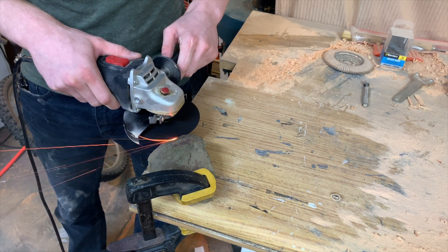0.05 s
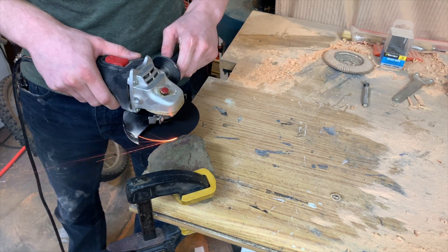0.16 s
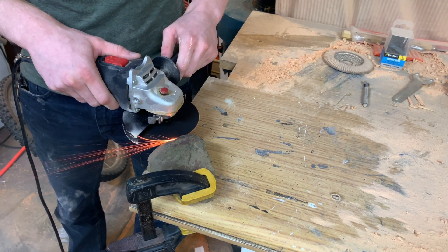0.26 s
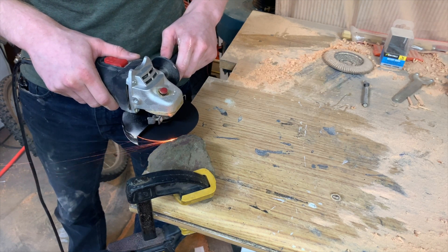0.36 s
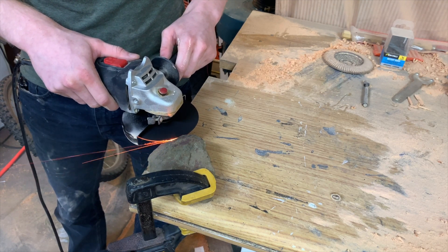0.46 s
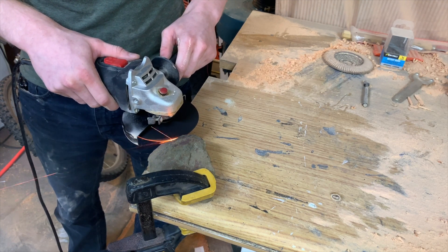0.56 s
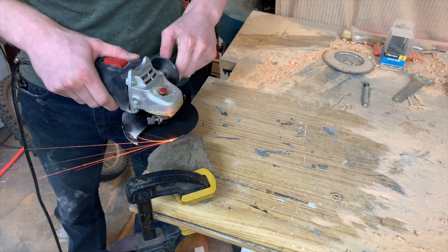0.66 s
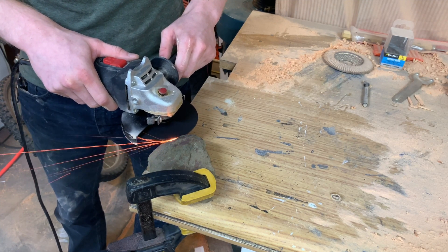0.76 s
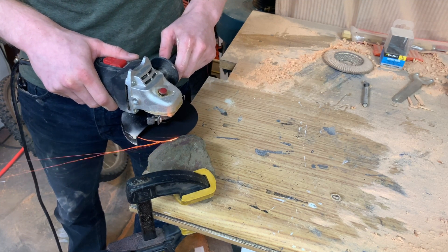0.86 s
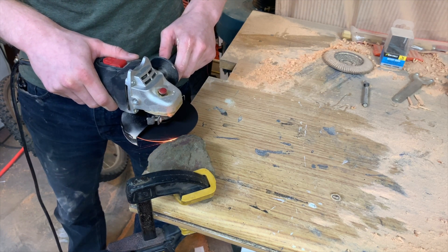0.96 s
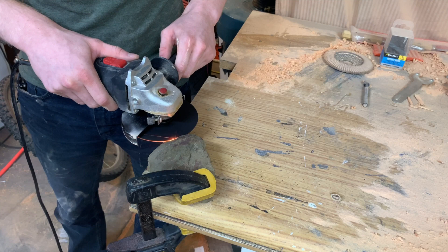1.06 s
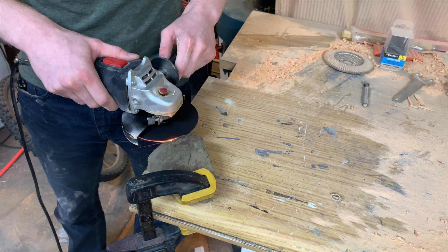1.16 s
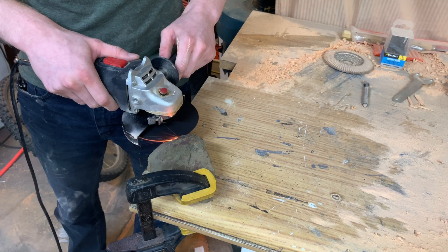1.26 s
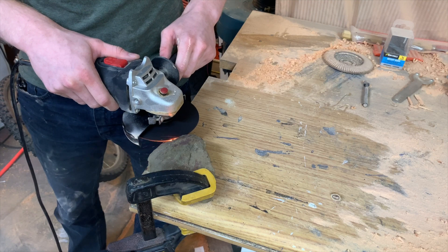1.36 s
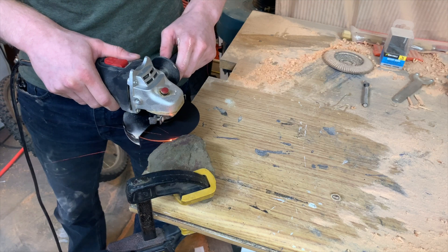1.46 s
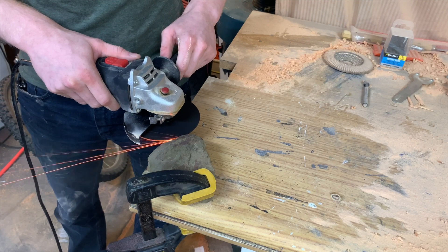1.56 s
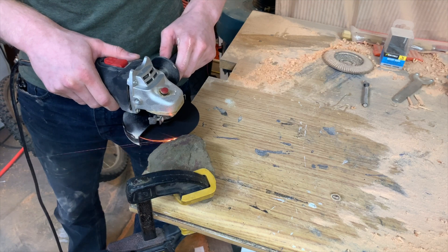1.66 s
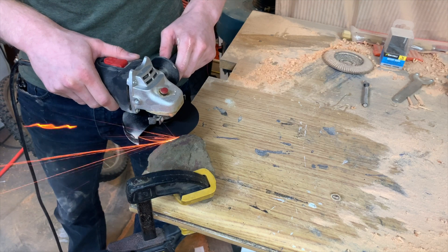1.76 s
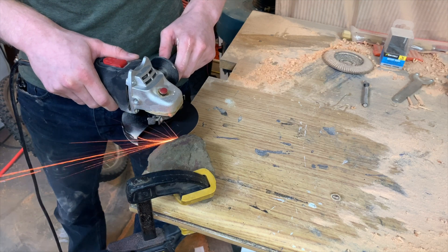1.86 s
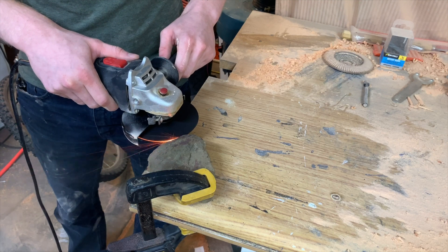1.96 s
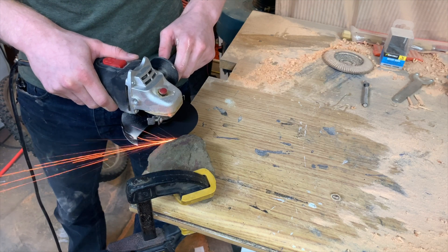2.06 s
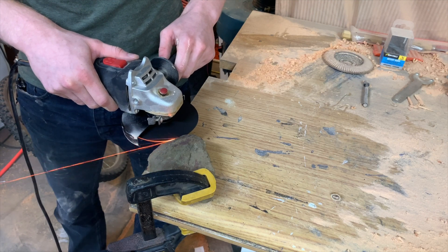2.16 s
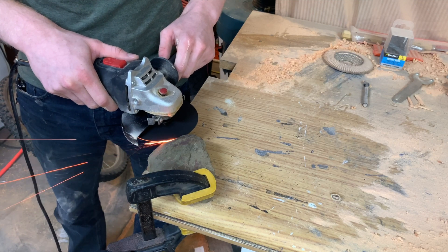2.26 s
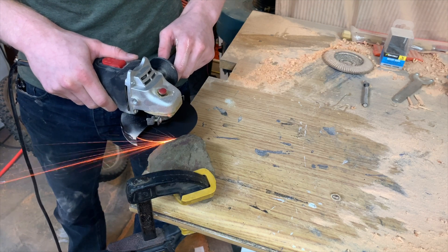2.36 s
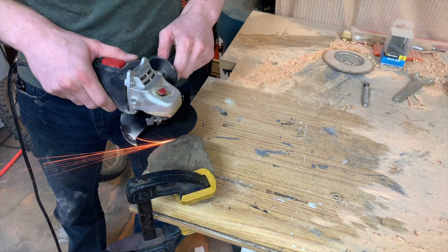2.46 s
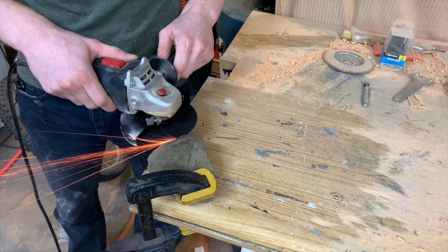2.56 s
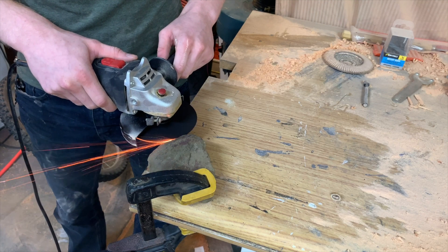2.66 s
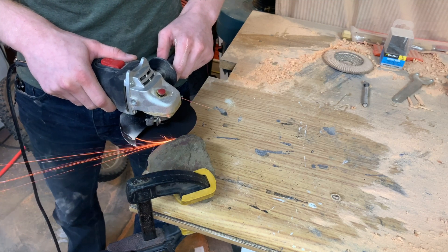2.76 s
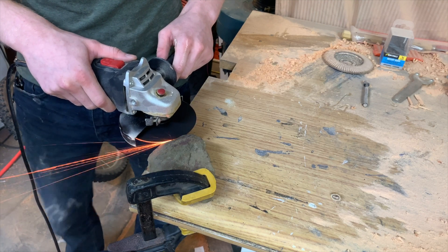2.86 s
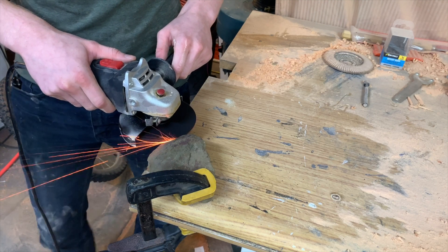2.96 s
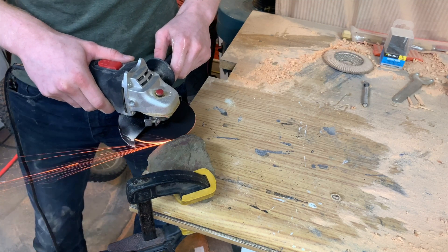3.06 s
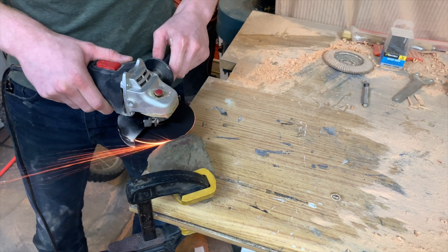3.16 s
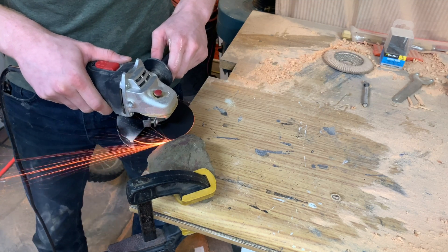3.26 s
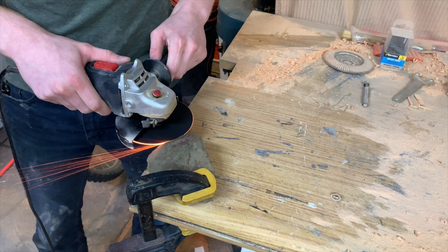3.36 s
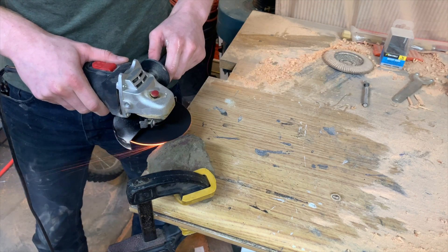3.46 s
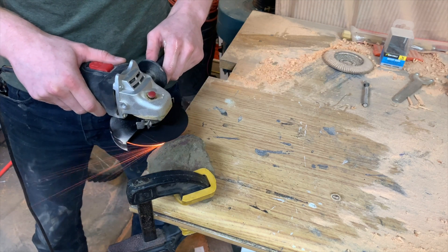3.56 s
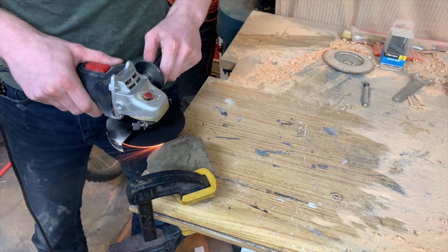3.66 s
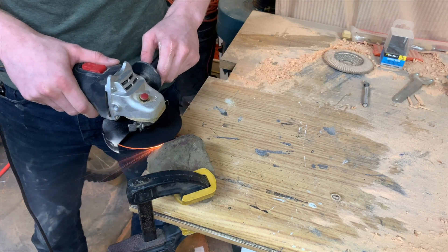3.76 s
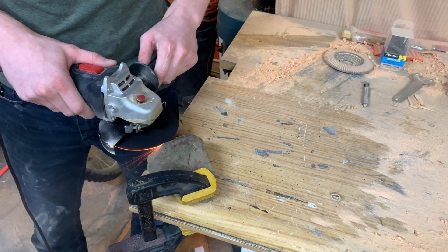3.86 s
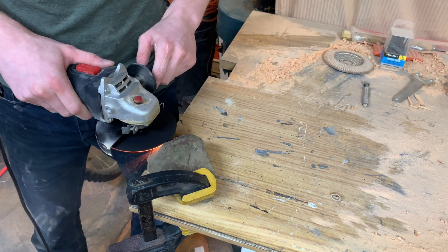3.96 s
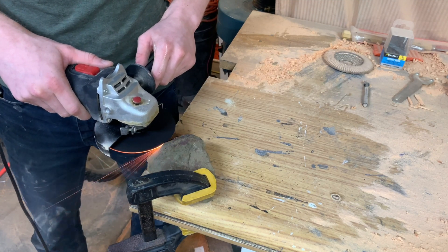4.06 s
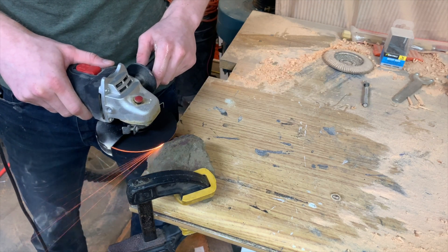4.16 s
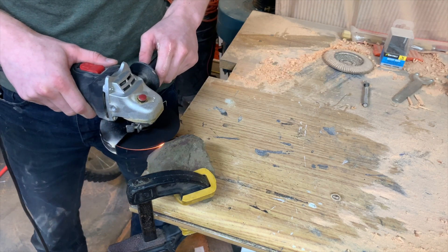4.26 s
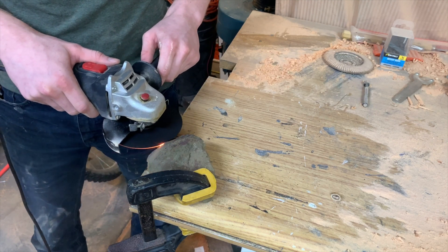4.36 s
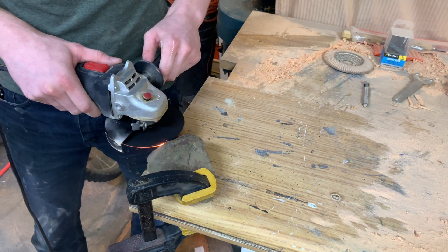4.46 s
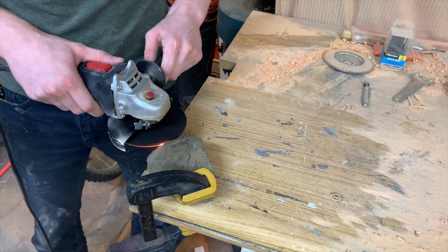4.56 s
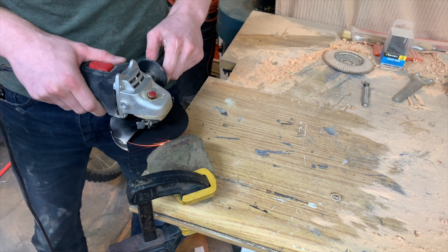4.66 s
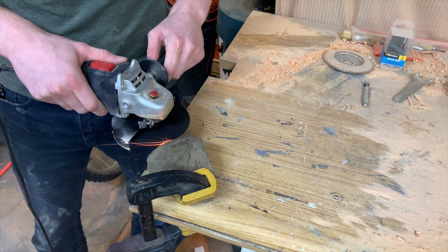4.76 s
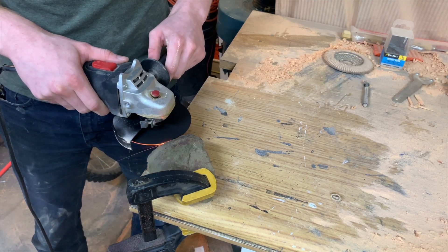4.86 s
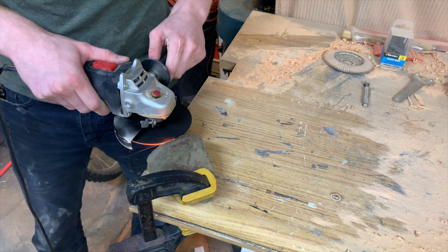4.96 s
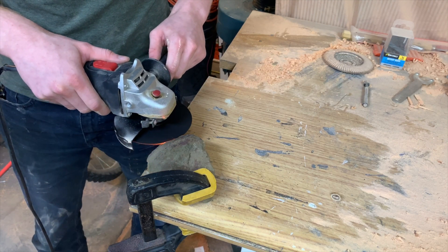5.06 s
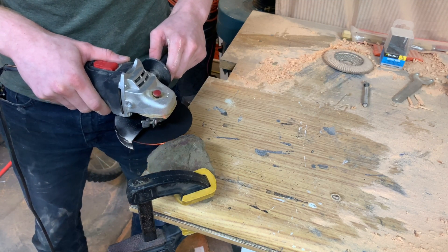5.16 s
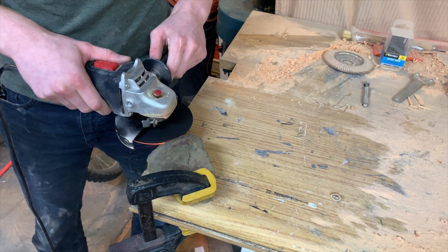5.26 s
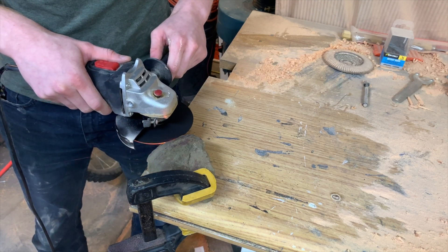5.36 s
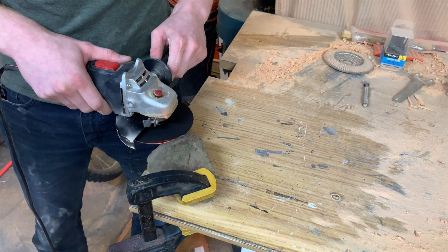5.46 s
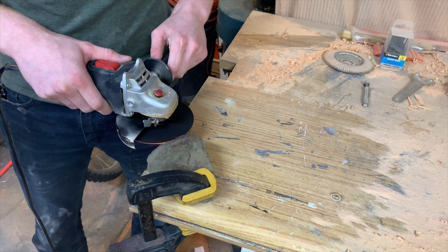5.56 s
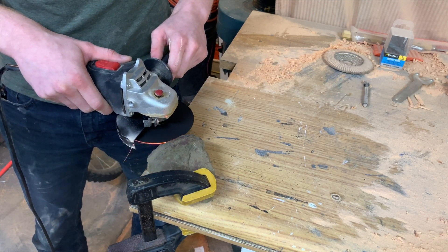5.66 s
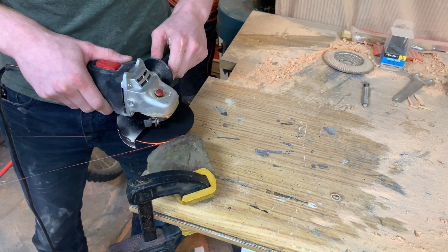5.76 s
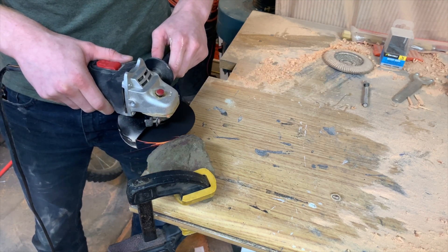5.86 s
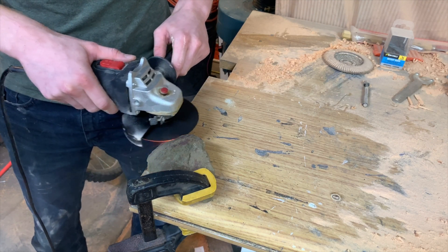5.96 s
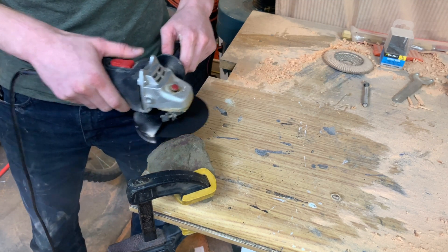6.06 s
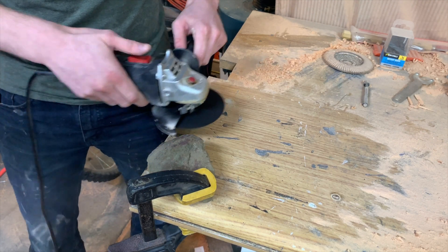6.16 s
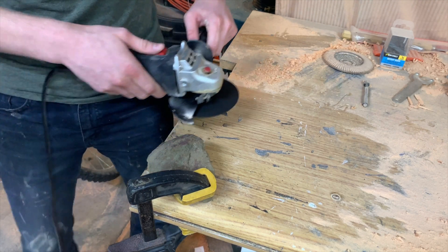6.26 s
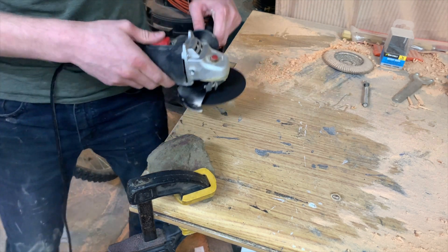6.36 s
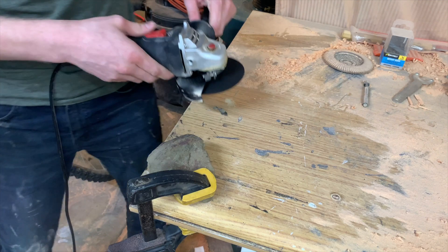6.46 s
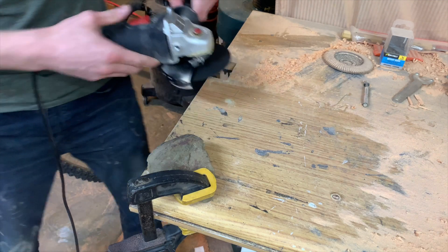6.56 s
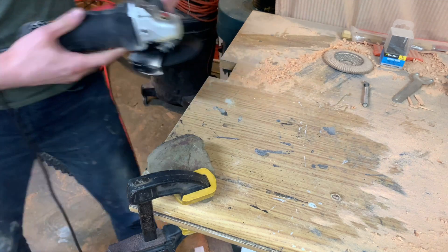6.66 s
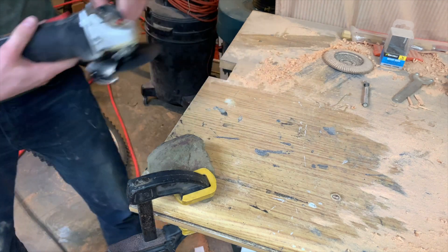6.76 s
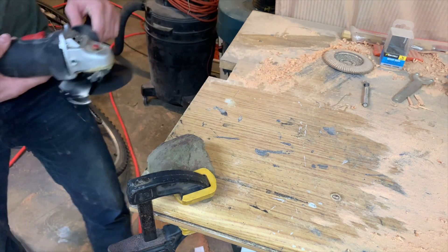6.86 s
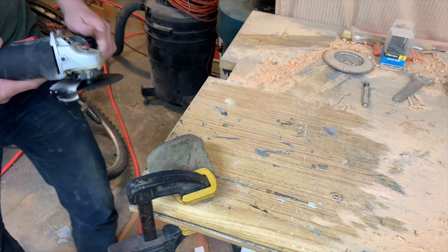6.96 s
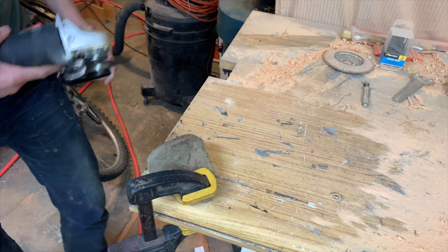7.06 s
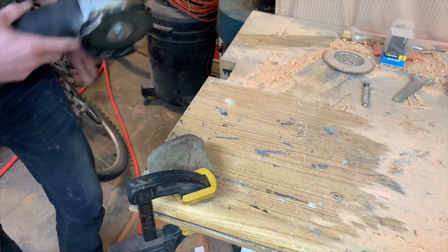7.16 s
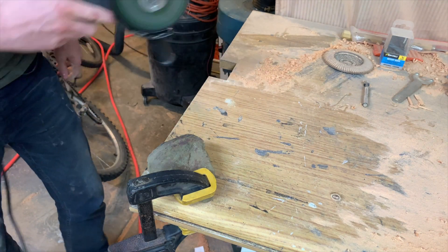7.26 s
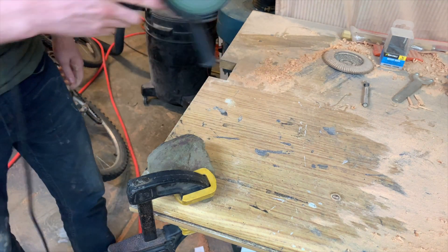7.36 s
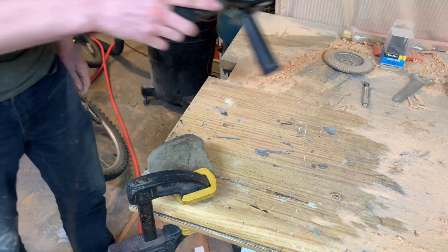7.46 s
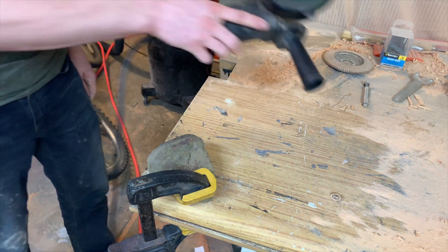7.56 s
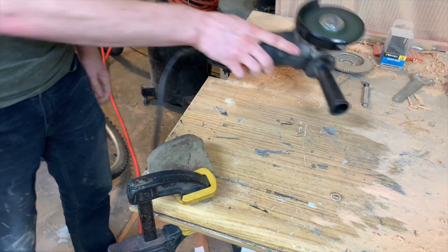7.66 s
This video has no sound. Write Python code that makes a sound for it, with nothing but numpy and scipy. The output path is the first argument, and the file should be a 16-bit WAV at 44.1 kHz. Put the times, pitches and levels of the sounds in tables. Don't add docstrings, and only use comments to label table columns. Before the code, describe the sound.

The sound begins with an angle grinder already cutting into a clamped rock in a workshop: a dense, loud, abrasive screech with bright gritty hiss, ringing wheel resonances around the upper midrange and a buzzing, fluttering drone from the tool body. From 0 to 3.5 seconds it bites steadily, speeding up slightly near 0.8, then sagging and labouring around 2 to 3.4. From about 3.6 to 4.9 the pressure eases; the wheel skims more lightly, quieter and faster, before bearing down again from 5 to 6. At about 6.1 the wheel lifts and the scraping cuts off at once. The freed motor revs up to full speed by 6.4, a breathy fan rush with hum and faint high whine. From about 6.7 power is off and the pitch sinks, with irregular metallic gear clacks and rattles until the end at 7.7, still spinning. Close stereo pickup, short room reverberation.

```python
import sys
import numpy as np
from scipy import signal
from scipy.fft import rfft, irfft, next_fast_len
from scipy.io import wavfile
from scipy.ndimage import uniform_filter1d

SR = 44100
rng = np.random.default_rng(int(sys.argv[2]) if len(sys.argv) > 2 else 0)


def to_wav(s):
    ch = np.atleast_2d(s).T
    pcm = np.round(np.clip(ch, -1, 1) * 32767)
    wavfile.write(sys.argv[1], SR, pcm.astype(np.int16))


def natural_amplitude(level_db):
    exponent = np.asarray(level_db, float) / 20
    return 10 ** exponent


N = 340438
TIME = np.arange(N) / SR
LIFT_S = 6.11


def evened(x):
    return x / np.sqrt(np.mean(x ** 2) + 1e-20)


def ramp(x, start, span):
    return np.clip((x - start) / span, 0, 1)


def columns(rows):
    s, *values = np.transpose(rows)
    return [np.interp(TIME, s, value) for value in values]


def read(points, hz):
    f, value = np.transpose(points)
    return np.interp(np.log(hz + 1), np.log(f + 1), value)


def colour(x, points, lag=((1, 0),)):
    size = next_fast_len(N)
    hz = np.fft.rfftfreq(size, 1 / SR)
    phase = -2 * np.pi * hz * read(lag, hz) / SR
    gain = natural_amplitude(read(points, hz)) * np.exp(1j * phase)
    return irfft(rfft(x, size) * gain, size)[..., :N]


def ring(x, modes):
    total = 0
    for k, (hz, width, db) in enumerate(modes):
        pole = np.exp((2j * hz - width) * np.pi / SR)
        mode = signal.lfilter([1], [1, -2 * pole, pole * pole], x).real
        total = total + (-1) ** k * natural_amplitude(db) * evened(mode)
    return evened(total)


def ring_moving(x, modes, stretch):
    total = np.zeros(N)
    for k, (hz, width, db) in enumerate(modes):
        carrier = np.exp(2j * np.pi * np.cumsum(hz * stretch) / SR)
        decay = np.exp(-np.pi * width / SR)
        smoothed = signal.lfilter([1], [1, -2 * decay, decay * decay], x / carrier)
        total += (-1) ** k * natural_amplitude(db) * evened((carrier * smoothed).real)
    return evened(total)


def drift(hz):
    rate = 400
    steps = rng.standard_normal(int(N / SR * rate) + 800)
    b, a = signal.butter(1, min(hz / (rate / 2), .99))
    slow = evened(signal.filtfilt(b, a, steps)[400:])
    return np.interp(np.arange(N) * rate / SR, np.arange(len(slow)), slow)


def grains(per_s, spread_db):
    size = natural_amplitude(spread_db * np.minimum(rng.exponential(1, N), 5))
    sign = rng.choice([-1., 1.], N)
    return size * sign * (rng.random(N) < per_s / SR)


# (f/Hz, level/dB)
ROOM_SPECTRUM = [(100, -7), (700, -4), (1400, 1), (2100, -2), (3400, -5), (5500, 1), (7500, -4),
                 (15000, -5)]


def room(x, count=3):
    t60, length = .25, 12000
    shape = (count, 2, length)
    taps = rng.choice([-1., 1.], shape) * (rng.random(shape) < .06)
    taps = taps * natural_amplitude(-60 * np.arange(length) / SR / t60)
    taps[..., :120] = 0
    taps = taps / np.linalg.norm(taps[0, 0])
    turn = np.pi * (1.311 * TIME + np.arange(count)[:, None] / count)
    feeds = np.sqrt(2 / count) * np.cos(turn) * colour(x, ROOM_SPECTRUM)
    wet = signal.oaconvolve(feeds[:, None], taps, axes=2).sum(0)[:, :N]
    bass = signal.butter(2, 800, fs=SR, output="sos")
    gap = signal.sosfiltfilt(bass, wet[0] - wet[1])
    return wet + np.array([-gap, gap]) * .3


# (f/Hz, level/dB)
FAN_AIR = [(60, -20), (200, -13.5), (600, -1), (1300, -1), (2200, 2.5), (4000, 3), (5500, -11), (8600, -3),
           (11000, -12), (13600, -6), (15500, -15)]
# (f/Hz, bandwidth/Hz, level/dB)
HOUSING_MODES = [(1370, 140, -13.5), (2060, 280, -9.5), (2420, 400, -11), (4240, 850, 4), (6830, 5500, 1.5)]
# (t/s, level/dB)
BLADE_WHINE = [
    (6.2, -46),
    (6.3, -36),
    (6.45, -31),
    (6.72, -32),
    (6.82, -44),
    (7.72, -54),
]
# (t/s, vents turned away/0-1, nearness/dB, armature hum/dB)
TOOL_SWING = [
    (6.12, 0, -1.5, -35),
    (6.42, 0.24, -0.5, -49),
    (6.55, 0.25, -3, -43.5),
    (6.78, 0, -2.5, -41),
    (7.05, 0, -2.5, -39.5),
    (7.3, 0.3, 1.5, -49),
    (7.43, 1, 1.5, -32.5),
    (7.6, 0.95, 7.5, -37),
    (7.72, 1, 5.5, -53),
]


def motor(speed, turns):
    away, near_db, hum_db = columns(TOOL_SWING)
    whine_db, = columns(BLADE_WHINE)
    loaded = np.clip((LIFT_S - TIME) / .06, 0, 1)

    speed_law, free_speed = 3.2, 163
    air_db = -27.5 + near_db + speed_law * 20 * np.log10(speed / free_speed)
    tilt_db = 9 - 7 * away
    air = evened(colour(rng.standard_normal(N) * natural_amplitude(1.5 * drift(27.0)), FAN_AIR))
    treble = signal.sosfilt(signal.butter(2, 5000, "high", fs=SR, output="sos"), air)
    air = natural_amplitude(air_db + 2.5) * (air + (natural_amplitude(tilt_db) - 1) * treble)

    slack = ramp(TIME, 6.66, 0.081)
    housing_db = -46 + 8 * slack * (1 - 1.6 * away)
    housing = natural_amplitude(housing_db + 4.6 * drift(25.0)) * ring(grains(9000, 3.4), HOUSING_MODES)

    gear, blades = 3, 18
    shaft = 2 * np.pi * gear * turns
    hum = np.sqrt(2) * np.cos(shaft + 0.33 * drift(29.0))
    hum = hum + 0.17 * np.cos(2 * shaft) + 0.19 * np.cos(shaft * 4 / gear)
    hum = natural_amplitude(hum_db + 1.25 * drift(15.0) - 7.2 * loaded) * hum
    whine = np.cos(blades * shaft + 2.9 * drift(6.5))
    whine = whine + 1.2 * np.cos(blades * shaft + shaft / gear + 2.7 * drift(30.0))
    return (air + housing + hum + natural_amplitude(whine_db) * whine) * natural_amplitude(-12 * loaded)


# (t/s, peak level/dB, low knock level/dB)
CLACKS = [(6.428, -20, -11), (6.4535, -11, -14), (6.5238, -14, -16), (6.5592, -17, -16), (6.5902, -17, -17),
          (6.65, -13, -2), (6.81, -19, 1), (6.8456, -18, 3), (6.887, -23, 2), (6.9304, -19, -3),
          (6.9928, -18, 1), (7.1499, -14, -3), (7.2023, -13, -2), (7.2467, -16, -6), (7.2586, -12, -18),
          (7.285, -16, -8), (7.317, -20, -15), (7.3587, -16, -20), (7.418, -13, -16), (7.4372, -14, -6),
          (7.4727, -16, -18), (7.5255, -18, -1), (7.5984, -18, -1), (7.624, -20, 5.5), (7.6543, -26, -8),
          (7.692, -17, -14)]
# (f/Hz, bandwidth/Hz, level/dB)
TOOTH_MODES = [(13700, 1500, 0), (9000, 3000, -11)]


def rattle():
    s, peak_db, low_db = np.transpose(CLACKS)
    at = (s * SR).astype(int)
    t = np.arange(2000) / SR
    rebound_s = .0082
    strikes = .3 + np.sin(np.pi * t / rebound_s) ** 2
    fade = .55 * strikes * np.minimum(t / .003, 1) * natural_amplitude(-60 * t / .1)
    high, low = np.zeros((2, N))
    high[at] = natural_amplitude(peak_db - 4.5)
    low[at] = natural_amplitude(peak_db + low_db - 3.0)
    ticks = grains(14000, 1.6)
    teeth = signal.oaconvolve(high, fade)[:N] * ring(ticks, TOOTH_MODES)
    knock = signal.oaconvolve(low, fade)[:N] * ring(ticks, HOUSING_MODES)
    return teeth + knock


def knocks(turns, count):
    total = 0
    for k in range(1, count):
        strength = natural_amplitude(3.0 * drift(7.0))
        phase = 2 * np.pi * (k * turns + rng.random()) + 0.7 * drift(20.0)
        total = total + strength * np.cos(phase)
    return evened(total)


# (t/s, eased off/0-1, leaned towards the rim/-1 to 1)
HANDS = [(0, 0.2, -0.18), (1, 0, 0.21), (1.4, 0.18, 0.17), (1.6, 0.06, 0.43), (2.1, 0.09, -0.39),
         (2.7, 0, -0.11), (3.47, .2, -0.79), (3.65, 0.08, 0.98), (4, 0.74, 0.76), (4.35, 0.9, 0.64),
         (4.6, 0.34, 0.68), (5, 0, 0.23), (5.4, 0.21, 0.3), (5.8, 0, 0.084), (6.1, 0.7, 1)]
# (f/Hz, level/dB)
GRIT_SPECTRUM = [(60, -43), (200, -23.5), (700, -13), (1700, -8), (3000, -0.5), (5200, -9), (8000, -2.5),
                 (14000, -8), (15500, -11)]
# (f/Hz, bandwidth/Hz, level/dB) in each
WHEEL_MODES = [(1870, 170, -0.5), (1903, 258, -1), (2034, 290, -7)]
OUTER_MODES = [(2265, 260, -1), (2492, 194, -5), (2534, 250, -5), (2793, 120, -12)]
UPPER_MODES = [(3736, 390, 6), (4110, 89, 5.5), (4164, 130, -6), (4520, 115, 9)]
RIM_MODES = [(6250, 340, -32), (7720, 305, 5.5), (8320, 400, -0.5), (9880, 170, 4.5), (11430, 1900, 8.5),
             (14120, 1230, 11)]
BODY_MODES = [(87.4, 18, -24), (139.8, 15, -19), (244, 39, -19), (375.6, 118, -0.5), (533, 90, -16),
              (643.7, 35, -6.5), (895, 120, -10.5), (1190, 52, -4), (1437, 310, -9)]
# (order/per turn, level/dB, more when labouring/dB, when skimming/dB, after the skim/dB)
WHEEL_ORDERS = [(1, -53.5, 1.2, -5.5, -2.5), (3, -44, 0, -0.5, -5.5), (4, -42.5, 0.5, -5.5, 5.5),
                (6, -52.5, 5, 16, 11), (7, -39.5, -2.5, -14, 1), (10, -47.5, 10, -6, 6)]


def grinding(speed, turns):
    eased, leaned = columns(HANDS)

    def level(db, eased_db, leaned_db):
        return db + eased * eased_db + leaned * leaned_db

    high_spot = 1 + .25 * np.cos(2 * np.pi * turns)
    high_spot = high_spot + 0.047 * np.cos(4 * np.pi * turns + 0.64)
    chatter = natural_amplitude(0.85 * drift(36.0) + 1.4 * drift(135.0))
    grit = evened(grains(14000, 2.5) * high_spot * chatter)
    knock_share = .16
    drive = np.sqrt(1 - knock_share) * grit + np.sqrt(knock_share) * knocks(turns, count=24)

    hiss = evened(colour(grit, GRIT_SPECTRUM) + 0.4 * ring(grit, RIM_MODES))
    hiss = natural_amplitude(level(-18.5, -1.6, 0.9) + 4.5) * hiss
    stiffer = (speed / 125) ** 0.2
    wheel = natural_amplitude(level(-22, -7.5, -0.1) - 0.5) * ring_moving(drive, WHEEL_MODES, stiffer)
    outer = natural_amplitude(level(-26, -4.5, 4.5) - 1.5) * ring(drive, OUTER_MODES)
    upper = natural_amplitude(level(-28.5, -3.5, -5) + 2.5) * ring(grit, UPPER_MODES)
    body = natural_amplitude(level(-26.5, -8.5, -0.5) - 5.5) * ring(grit + 0.2 * drive, BODY_MODES)

    skim_from, skim_to, skim_ramp = 3.62, 5.02, .12
    labouring = ramp(-speed, -129.7, 5.6)
    after = ramp(TIME, skim_to - skim_ramp, skim_ramp)
    skimming = ramp(TIME, skim_from, skim_ramp) - after
    state = np.array([labouring, skimming, after])
    tones = 0
    for order, db, *more_db in WHEEL_ORDERS:
        strength = natural_amplitude(db + 1.5 + more_db @ state + 3.8 * drift(18.0))
        tones = tones + strength * np.cos(2 * np.pi * round(order) * turns + .6 * drift(10.0))
    tones = tones * ramp(-TIME, .02 - LIFT_S, 0.12)

    lifted = np.maximum(TIME - LIFT_S, 0)
    return (hiss + wheel + outer + upper + body + tones) * natural_amplitude(-333 * lifted)


# (t/s, speed/turns per s)
WHEEL_SPEED = [(0, 127), (.8, 134.6), (1.6, 125.8), (2.28, 121.7), (2.75, 120.9), (3.2, 123.3),
               (3.45, 121.5), (3.65, 127), (4.08, 144.8), (4.42, 142.2), (4.9, 132), (5.35, 129.2),
               (5.75, 130.8), (6.01, 135.5), (6.27, 160), (6.42, 166), (7.32, 121.3), (7.72, 108.6)]
# (f/Hz, level/dB)
VENTS_AWAY = [(300, 2), (1500, 4), (3400, 8), (6000, 3), (9000, 0)]
# (f/Hz, left minus right/dB)
PORT_BALANCE = [(60, -1), (200, -2), (400, .5), (700, 3), (1400, 7), (2070, 6), (2760, 1), (3400, 0),
                (5200, -2), (6500, 0)]
# (f/Hz, delay/samples)
RIGHT_PORT_LAG = [(600, 0), (1400, 2), (2070, 3.4), (2760, 5.8), (3300, 6.7), (5000, 6.6), (7500, 5.9),
                  (10600, 6.25), (13700, 6.4), (15900, 7)]


def scene():
    speed, = columns(WHEEL_SPEED)
    turns = np.cumsum(speed) / SR
    rim = grinding(speed, turns) + rattle()
    drive = motor(speed, turns)
    tool = rim + drive
    direct = np.array([tool, colour(tool, [(1, 0)], RIGHT_PORT_LAG)])
    left, right = direct + room(rim + colour(drive, VENTS_AWAY))
    hz, db = np.transpose(PORT_BALANCE)
    return np.array([colour(left, np.c_[hz, db / 2]), colour(right, np.c_[hz, -db / 2])])


# (f/Hz, level under the other/dB)
UNDER_OTHER = [(2000, -30), (2900, -6.5), (3450, -5.8), (3900, -9), (5500, -8.5), (6800, -4), (9300, -5),
               (10250, -3.2), (11100, -4.2), (13000, -3.5), (14600, 3), (15000, -2), (16000, -9)]
# (f/Hz, level under the loudest treble/dB)
UNDER_TREBLE = [(3000, -46), (13500, -26), (15000, -22), (15250, -9), (16000, -12)]


def masked_bands(x, size=2048, count=8):
    pair = np.array([x[0] + x[1], x[0] - x[1]]) / 2
    hz, _, z = signal.stft(pair, SR, "cosine", size, size // 2)
    band = np.arange(len(hz)) // count
    edges = np.arange(0, len(hz), count)
    centre = hz[edges] + hz[count // 2]
    level_db = 10 * np.log10(np.add.reduceat(abs(z) ** 2, edges, axis=1) + 1e-20)
    level_db = uniform_filter1d(level_db, size=2, axis=2)
    level_db = uniform_filter1d(level_db, size=3, axis=1)
    chance = rng.standard_normal(level_db.shape[1:])
    chance = evened(uniform_filter1d(chance, size=3, axis=0))
    treble_db = level_db[:, (centre > 7000) & (centre < 14000)].max(axis=(0, 1))
    masked = level_db - level_db[::-1] + 1.1 * chance < read(UNDER_OTHER, centre)[:, None]
    weak = level_db - treble_db + 3.5 * chance < read(UNDER_TREBLE, centre)[:, None]
    kept = z * ~(masked | weak)[:, band]
    mid, side = signal.istft(kept, SR, "cosine", size, size // 2)[1][:, :N]
    return np.array([mid + side, mid - side])


def band_limit(x):
    return signal.sosfilt(signal.butter(12, 15980, fs=SR, output="sos"), x)


def record(dry):
    rounded = dry / (1 + abs(dry / .93) ** 6) ** (1 / 6)
    mix = masked_bands(rounded)
    return band_limit(mix)


dry = scene()
out = record(dry)
to_wav(out)
```